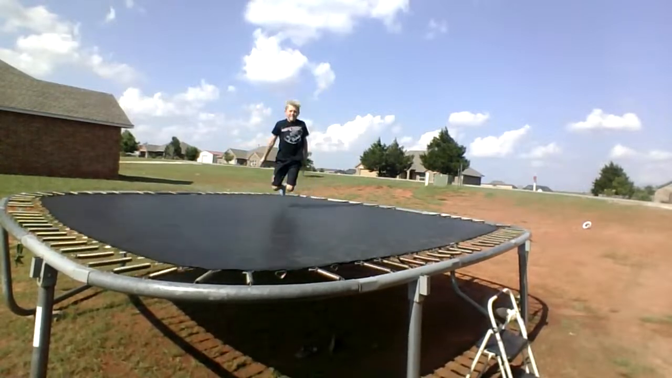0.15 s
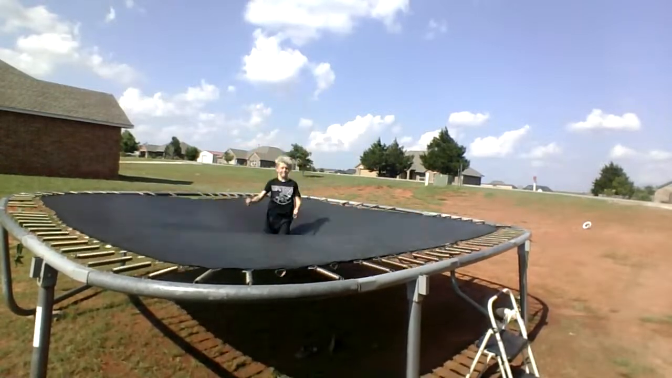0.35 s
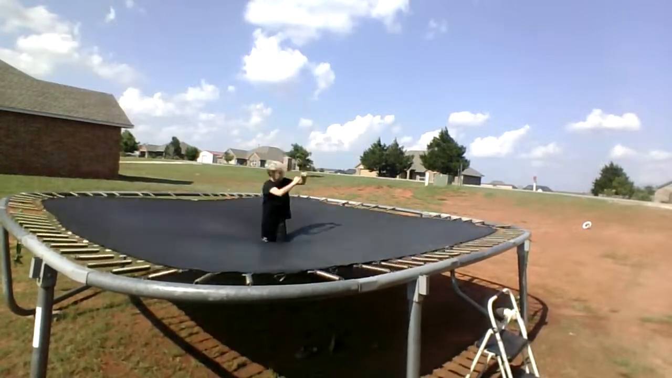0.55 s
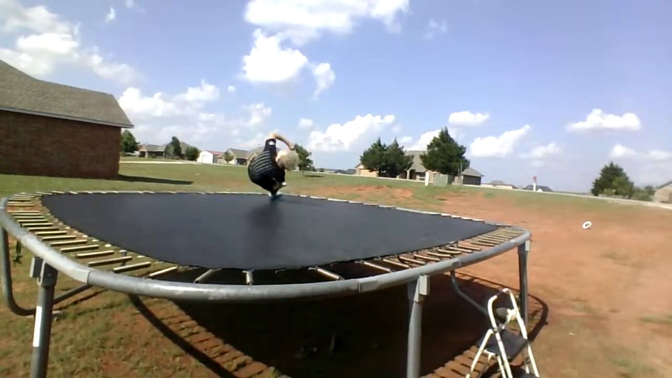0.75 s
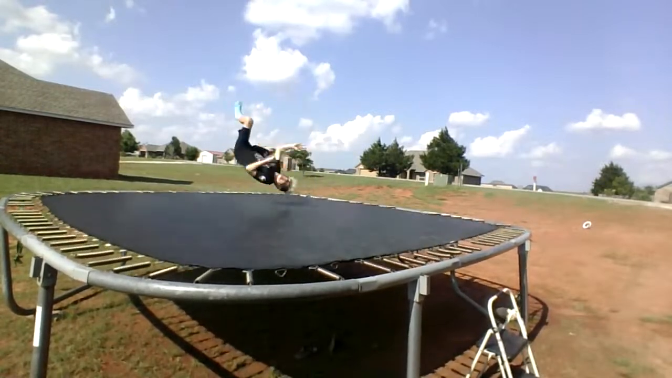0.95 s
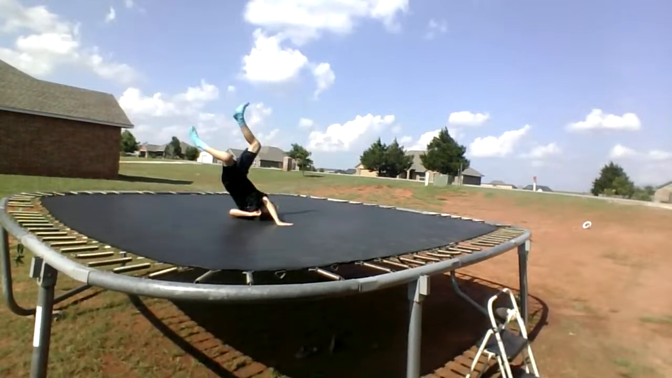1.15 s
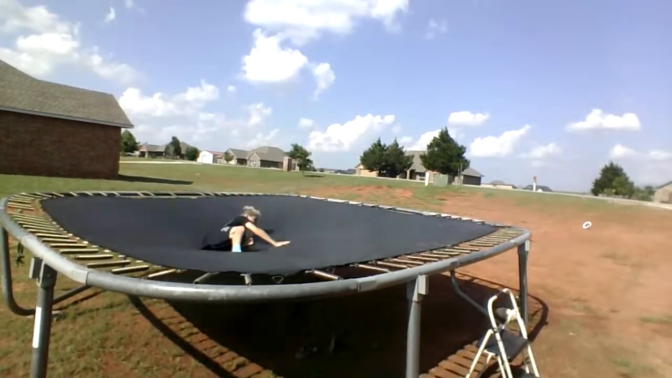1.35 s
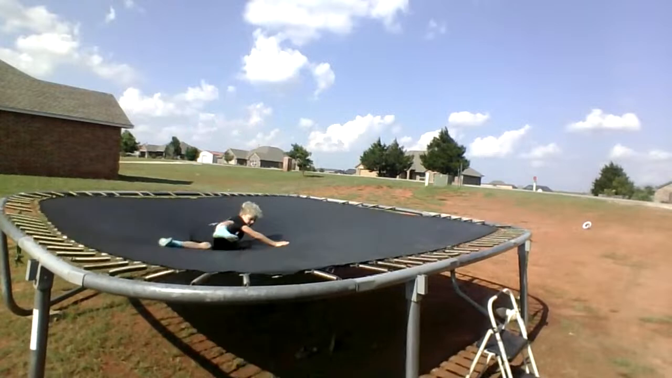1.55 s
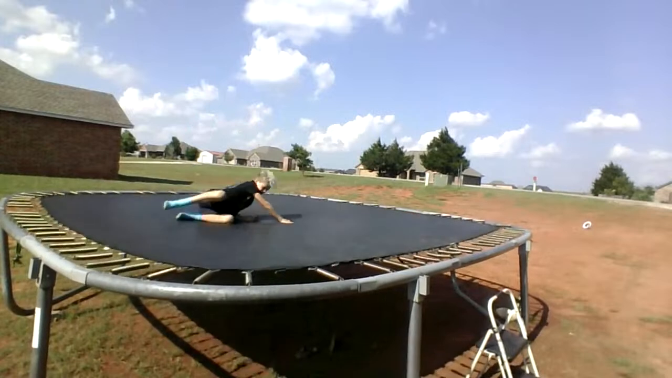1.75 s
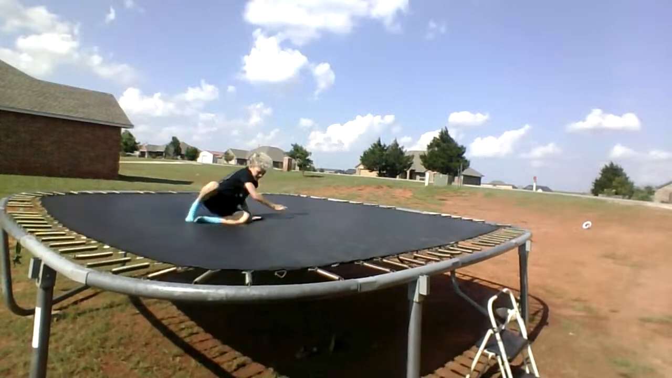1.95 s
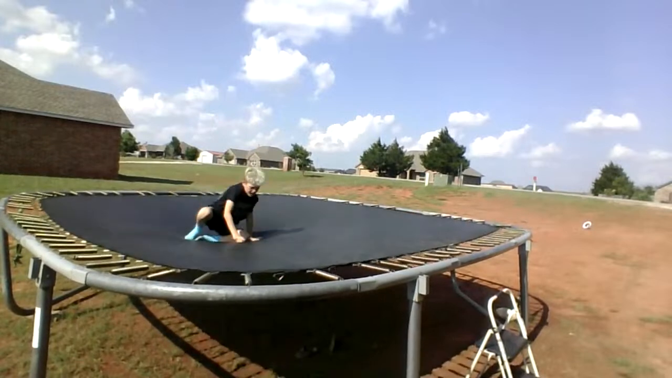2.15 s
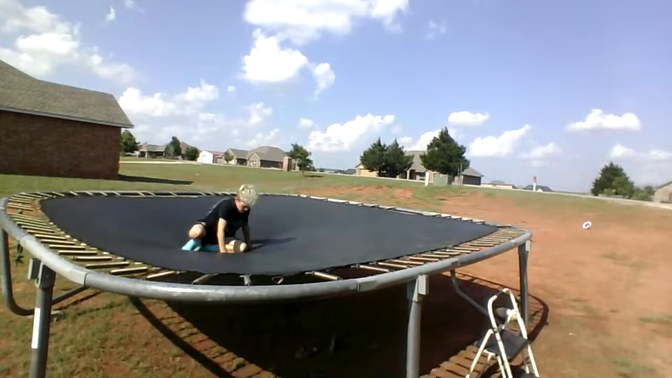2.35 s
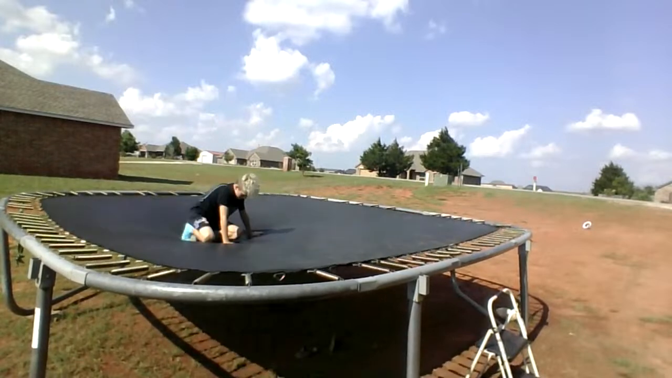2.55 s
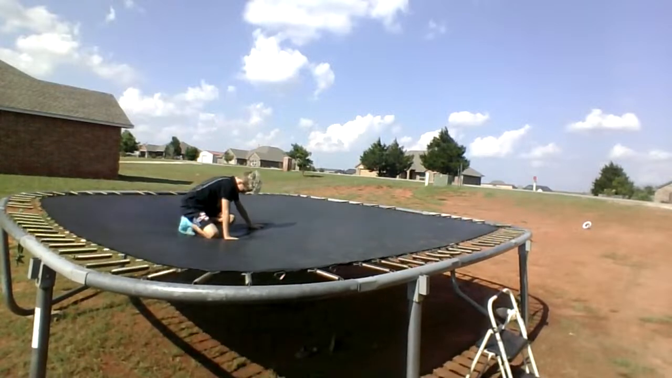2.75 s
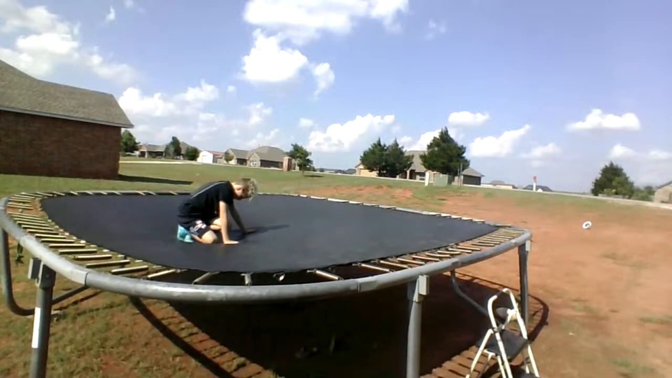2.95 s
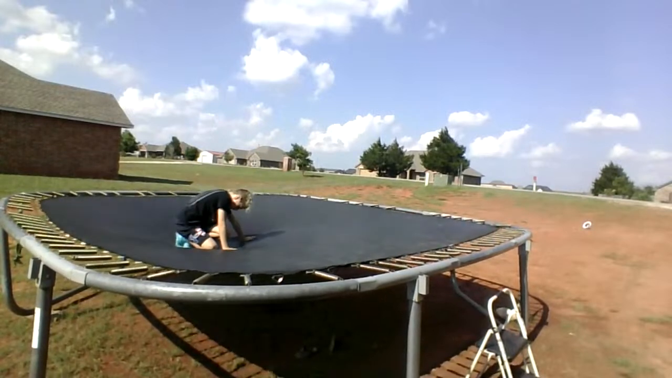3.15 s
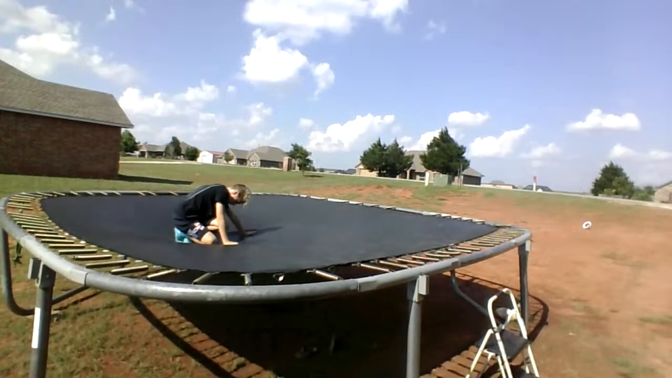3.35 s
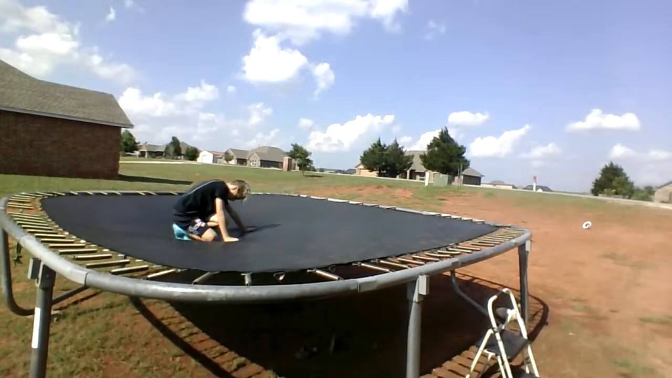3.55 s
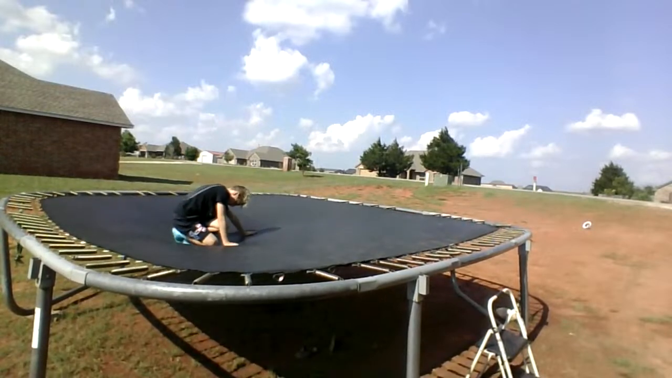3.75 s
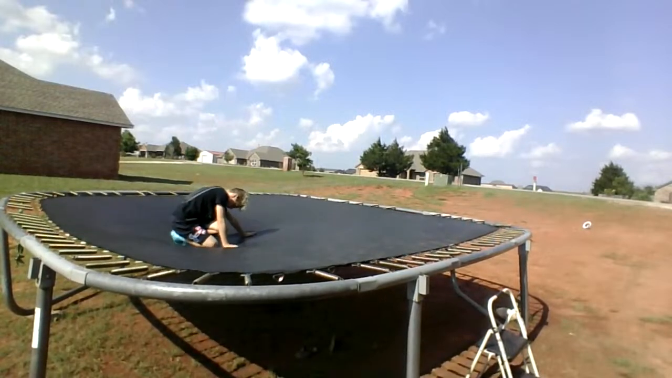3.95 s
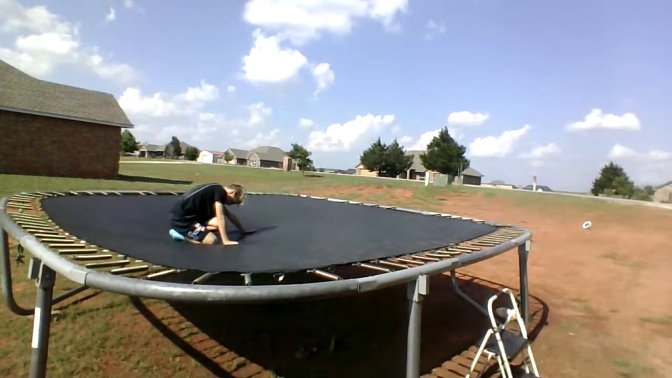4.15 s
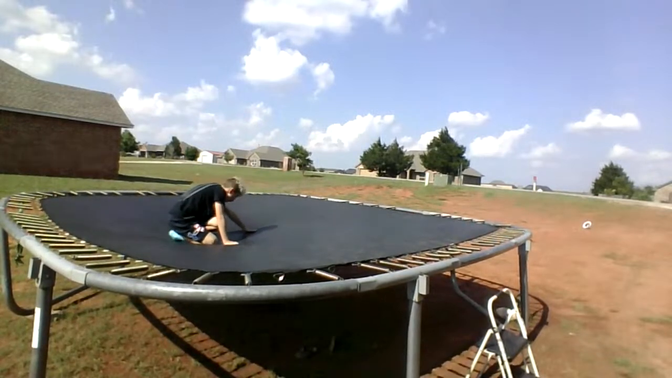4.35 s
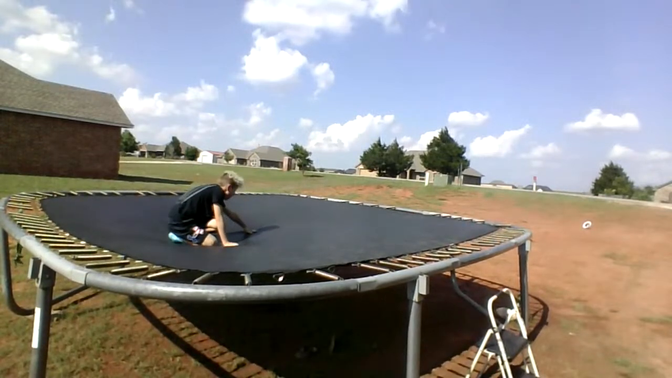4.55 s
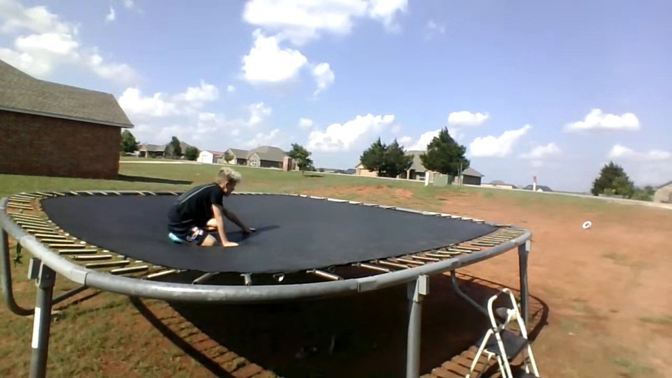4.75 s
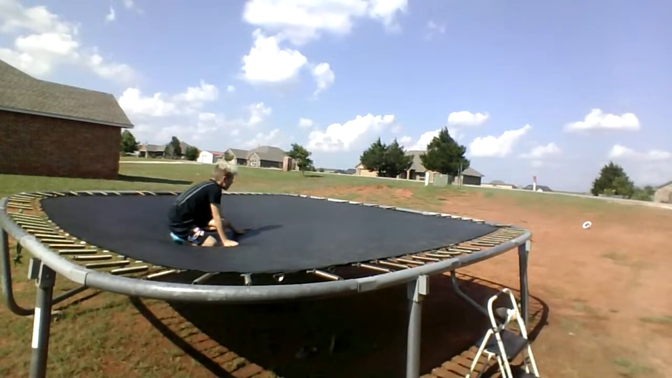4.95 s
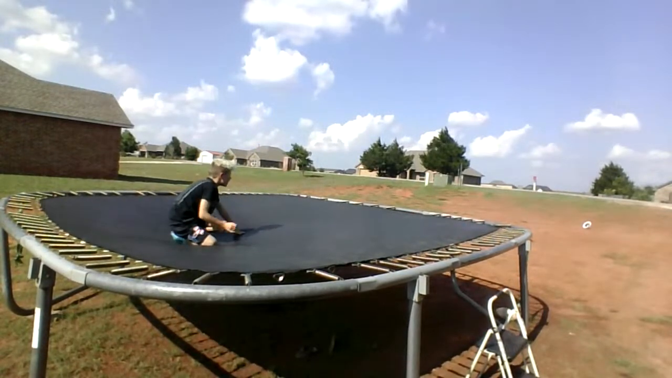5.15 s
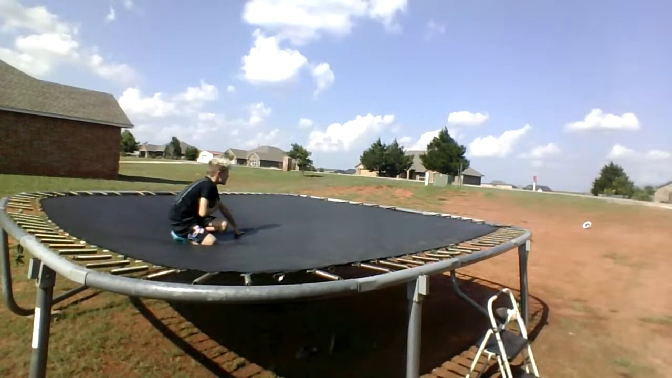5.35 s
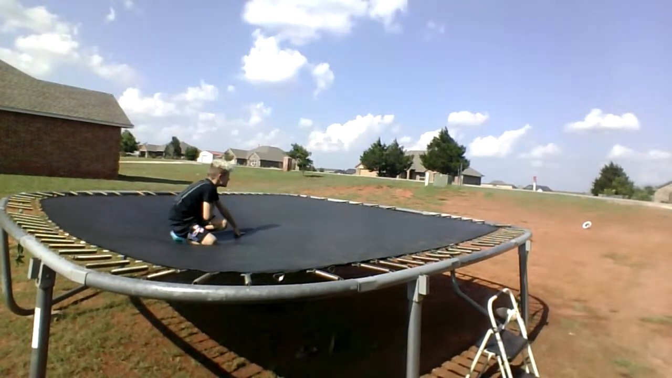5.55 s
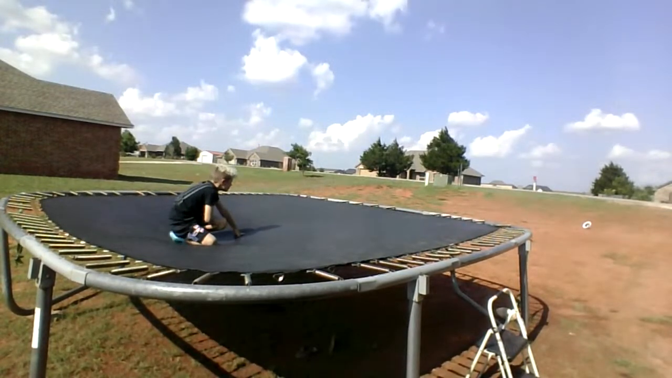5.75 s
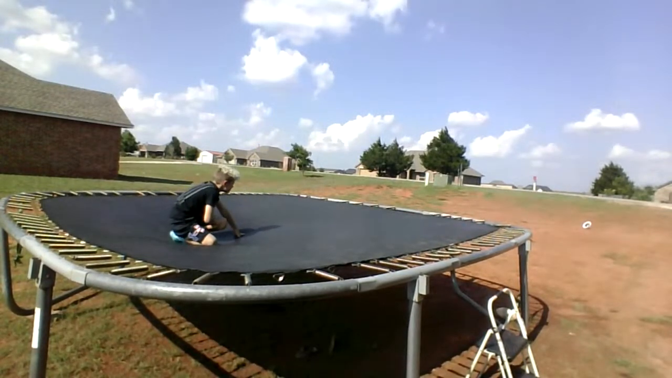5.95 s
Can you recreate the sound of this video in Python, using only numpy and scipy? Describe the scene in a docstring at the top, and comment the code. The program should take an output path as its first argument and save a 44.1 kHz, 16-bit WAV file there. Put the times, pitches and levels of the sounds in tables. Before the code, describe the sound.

Loud rusty metallic creaking and sharp spring clanks as someone bounces on a trampoline, fading to small ticks, cloth scuffs and quiet wind.

```python
"""Child on a garden trampoline

A child bounces twice, lands from a flip and rocks to rest on the mat.
The steel springs creak and squeal (stick-slip into ringing modes) and clank on the frame (decaying noise).
The mat thumps (short booms with a slap), cloth scuffs (noise bands) and the frame's joints knock.
A breeze rumbles (filtered noise) and whistles (a wavering tone) round the frame; a low hum swells once."""
import sys
import numpy as np
from scipy import signal
from scipy.fft import rfft, irfft, next_fast_len
from scipy.io import wavfile
from scipy.ndimage import uniform_filter1d, map_coordinates

SR = 44100
rng = np.random.default_rng(int(sys.argv[2]) if len(sys.argv) > 2 else 0)


def bounce(signal):
    """Save signal as a 16-bit WAV file at the path given by the first command-line argument."""
    frames = np.transpose(np.atleast_2d(signal))
    limited = np.clip(frames, -1, 1)
    pcm = np.round(limited * 32767).astype(np.int16)
    wavfile.write(sys.argv[1], SR, pcm)


N = 268565
TIME = np.arange(N) / SR


def amp(db):
    """Decibels to gain."""
    return 10 ** (np.asarray(db) / 20)


def evened(x):
    """Scales to rms 1."""
    return x / np.sqrt(np.mean(x ** 2) + 1e-20)


def steadied(x, seconds):
    """Scales to a running rms of 1."""
    return x / np.sqrt(abs(uniform_filter1d(x ** 2, max(int(seconds * SR), 8))) + 1e-12)


def sine(hz):
    """A tone of rms 1 that follows a pitch curve."""
    return np.sqrt(2) * np.sin(2 * np.pi * np.cumsum(hz) / SR)


def read(points, hz):
    """Reads a table on a log-frequency axis."""
    f, value = np.transpose(points)
    return np.interp(np.log(hz + 1), np.log(f + 1), value)


def played(rows):
    """The columns of a curve table at every sample."""
    s, *columns = np.transpose(rows)
    return [np.interp(TIME, s, c) for c in columns]


def add(mix, s, sound):
    """Mixes a sound in from time s."""
    start = round(s * SR)
    sound = sound[max(-start, 0):]
    part = mix[max(start, 0):][:len(sound)]
    part += sound[:len(part)]


def coloured(x, points):
    """Filters by a (Hz, dB) spectrum."""
    size = next_fast_len(len(x) + 2048)
    gain = amp(read(points, np.fft.rfftfreq(size, 1 / SR)))
    return irfft(rfft(x, size) * gain, size)[:len(x)]


def band(x, lo_hz, hi_hz, order=4):
    """Band-pass filter."""
    edges = [lo_hz, min(hi_hz, SR / 2 - 1)]
    return signal.sosfilt(signal.butter(order, edges, "bandpass", fs=SR, output="sos"), x)


def tilted(x, tilt_db):
    """Tilts the spectrum by dB per octave about 3 kHz, from 1 to 16 kHz."""
    return coloured(x, [(f, tilt_db * np.log2(f / 3000)) for f in (1000, 16000)])


def wander(per_s, count=N):
    """A smooth random curve of rms about 1, with per_s random knots a second."""
    knots = rng.standard_normal(4096)
    return map_coordinates(knots, [np.arange(count) * per_s / SR], order=2, mode="wrap")


def patchy(x, depth_db, width_hz, seconds):
    """Lets narrow strips of the spectrum swell and fade on their own."""
    hz, at, z = signal.stft(x, SR, nperseg=1024, noverlap=768)
    places = np.meshgrid(hz / width_hz, at / seconds, indexing="ij")
    field = map_coordinates(rng.standard_normal((512, 512)), places, order=2, mode="wrap")
    return signal.istft(z * amp(depth_db * field), SR, nperseg=1024, noverlap=768)[1][:len(x)]


def resonance(x, hz, width_hz):
    """Rings one mode, whose pitch may move."""
    turn = np.exp(2j * np.pi * np.cumsum(hz * np.ones(len(x))) / SR)
    decay = np.exp(-np.pi * width_hz / SR)
    return (turn * signal.lfilter([1], [1, -decay], x / turn)).imag


def slipping(per_s, spread_db, count=N):
    """A random train of tiny slips of uneven size and either sign."""
    sizes = rng.choice([-1, 1], count) * amp(spread_db * np.minimum(rng.exponential(1, count), 3))
    return sizes * (rng.random(count) < per_s / SR)


# each pull on the springs, as the mat is loaded or rebounds:
# (time at the hardest [s], creak level [dB], rise [s], fall [s],
#  low groan relative to the creak [dB], high rasp relative to the creak [dB])
PULLS = [(.005, -52, 0.028, 0.074, -2, -0.5), (.1, -65.5, 0.033, 0.15, 9.5, 8),
         (0.213, -62, 0.019, 0.063, 7.5, -4), (0.402, -34.5, 0.019, 0.13, -1, -6),
         (0.466, -33, 0.1, 0.2, 0.5, 2.5), (0.542, -24.5, 0.13, 0.068, -4.5, -3.5),
         (0.724, -27, 0.15, 0.13, -6.5, -3.5), (0.869, -35.5, 0.2, 0.14, -6.5, 3),
         (0.957, -38.5, 0.038, 0.086, -7.5, 2), (1.049, -45.5, 0.019, 0.073, -26, 8.5),
         (1.489, -24.5, 0.12, 0.13, -2, -2), (1.577, -28.5, 0.087, 0.089, -1, -12),
         (1.728, -32.5, 0.11, 0.16, -5.5, 0), (1.845, -42, 0.062, 0.08, 0, -1),
         (1.951, -39.5, 0.04, 0.063, -15, 0), (2.132, -58, 0.015, 0.02, 9, 3),
         (2.21, -48.5, 0.14, 0.46, -5, 3), (2.344, -33.5, 0.097, 0.098, -6, -4.5),
         (2.419, -39.5, 0.096, 0.091, -5.5, 3.5), (2.649, -52, 0.048, 0.14, -6.5, 0.5),
         (2.772, -46.5, 0.12, 0.093, -14, 1), (2.83, -51, .03, 0.062, -15.5, -0.5),
         (3.135, -59, 0.083, 0.082, -8, 3), (3.225, -50.5, 0.1, 0.082, -6.5, -2.5),
         (3.55, -71.5, 0.27, 0.21, 3, 8.5), (5.05, -68.5, 0.022, 0.093, 2, 6.5)]
PULL_DROP_DB = 24.5  # level lost over one rise or fall time
TIGHTEN, RELAX = 1.527, 1.3  # powers that bend the rise and the fall
SWAY_S, SWAY_LENGTH_S, SWAY_DB = 2, 1.5, -68  # the swaying mat keeps the springs faintly alive
AIRBORNE_S, LANDING_S, SLACK_DB = 0.29, .387, -13.5  # the springs hang slack until the knees land


def strain(step_size=32):
    """Gains of the creak, groan and rasp: every pull builds up and lets go, and their powers add."""
    t = TIME[::step_size]
    sway = amp(SWAY_DB) * np.exp(-(2 * (t - SWAY_S) / SWAY_LENGTH_S) ** 2)
    power = np.ones((3, 1)) * sway ** 2
    for s, db, rise, fall, groan_db, rasp_db in PULLS:
        before = (np.maximum(s - t, 0) / rise) ** TIGHTEN
        after = (np.maximum(t - s, 0) / fall) ** RELAX
        shape = amp(-PULL_DROP_DB * np.minimum(before + after, 10))
        power += (amp([[db], [db + groan_db], [db + rasp_db]]) * shape) ** 2
    slack = amp(SLACK_DB * ((t > AIRBORNE_S) & (t < LANDING_S)))
    return [np.interp(TIME, t, slack * gain) for gain in np.sqrt(power)]


# ringing of the springs and frame: (frequency [Hz], width [Hz], level [dB])
STEEL = [(1138, 120, -7.5), (1914, 100, 3), (2309, 100, 0), (2850, 220, 1), (3423, 110, -3.5),
         (4060, 130, -6), (4610, 84, -6.5), (5030, 51, -6.5), (6880, 76, -8)]


def steel_ring(t):
    """The main modes of the steel, struck together, each starting at a random phase."""
    modes = 0
    for hz, width, db in STEEL:
        modes += amp(db) * np.exp(-np.pi * width * t) * np.sin(2 * np.pi * (hz * t + rng.random()))
    return evened(modes)


def coil_ring(t, t60, count=34):
    """The scattered overtones of one coil, t60 being that at 3 kHz; the high ones die sooner."""
    place, size, turn = rng.random((3, count, 1))
    hz = 900 + 14000 * ((np.arange(count)[:, None] + place) / count) ** 1.8
    fade = amp(-60 * t / t60 * np.sqrt(hz / 3000))
    return evened((size * np.sin(2 * np.pi * (hz * t + turn)) * fade).sum(0))


# tone of the straining springs, shared by ticks and clinks: (frequency [Hz], density [dB per Hz])
CREAK_COLOUR = [(180, -49.5), (300, -24), (400, -5), (749, -1), (850, -11), (1350, -10), (1650, -12.5),
                (1850, -10.5), (2930, -4), (3640, -6.5), (6850, -8.5), (7900, -15.5), (10500, -9.5),
                (14000, -6), (16000, -5)]


def creak(slips_per_s=1100, spread_db=2.5, steel_db=-12, scrape_db=4.02, shift_db=3.0, rattle_db=1):
    """Hooks stick and slip, spring after spring: light pulls ring the coils, hard ones add dry crackle."""
    t, dry, rung = np.arange(SR // 8) / SR, np.zeros(N), np.zeros(N)
    scrape_t60, coil_t60 = .004, .17  # s
    turn_s, turn_gap_s = .13, .035  # each spring's turn, and the time until the next one joins
    harshen = .55  # power of the pull that brings in the crackle
    turn, frame = np.hanning(int(turn_s * SR)), amp(steel_db) * steel_ring(t)
    for s in np.arange(-turn_s, N / SR, turn_gap_s):
        scrape = evened(rng.standard_normal(len(t)) * amp(-60 * t / scrape_t60))
        slips = turn * slipping(slips_per_s, spread_db, len(turn))
        add(dry, s, signal.fftconvolve(slips, scrape))
        add(rung, s, signal.fftconvolve(slips, coil_ring(t, coil_t60) + frame))
    middle, groan, rasp = strain()
    crackle = amp(scrape_db) * (middle / middle.max()) ** harshen * dry
    body = coloured(rung + crackle, CREAK_COLOUR)
    # as the contact points creep, different modes catch
    body = patchy(body, shift_db, 150, .06)
    # the load shudders from spring to spring
    groan = groan * amp(rattle_db * wander(70))
    middle = middle * amp(rattle_db * wander(70))
    top = coloured(rung + dry, CREAK_COLOUR)
    low_part = groan * steadied(band(body, 490, 1800), 0.014)
    middle_part = middle * steadied(band(body, 1950, 8000), 0.031)
    high_part = rasp * steadied(band(top, 8000, 16500), 0.031)
    return low_part + middle_part + high_part


def clinks(count=24, per_s=110, t60=.05, spread_db=2.5, level_db=-5.5):
    """Hooks jump a whole notch: separate short clinks, each on the notes of its own spring."""
    t = np.arange(SR // 8) / SR
    middle, _, _ = strain()
    rings = np.zeros(N)
    for _ in range(count):
        jumps = slipping(per_s / count, spread_db)
        rings += signal.oaconvolve(jumps, coil_ring(t, t60))[:N]
    return amp(level_db) * middle * evened(band(coloured(rings, CREAK_COLOUR), 1200, 7000))


# the notes that the stretched coils keep returning to: (frequency [Hz], level [dB])
COIL = [(1529, -7), (2385, -9.5), (2800, -6), (2900, -3), (3042, -5), (3380, 0), (3840, -1), (4700, -0.5),
        (5399, -7.5)]


def coils(ring_db=-51, width_hz=20, taut_db=-35, uneven_db=3, drift=0.0037):
    """Slips keep the coils ringing on drifting notes that grow no louder once the springs are taut."""
    middle, _, _ = strain()
    # ring_db holds for a pull of -40 dB; pulls under -58 dB fade twice as steeply
    pull = np.minimum(middle, amp(taut_db)) / amp(-40) * np.minimum(middle / amp(-58), 1)
    notes = np.zeros(N)
    for hz, db in COIL:
        level = amp(db + uneven_db * wander(22))
        ring = resonance(slipping(500, 4.4), hz * (1 + drift * wander(12)), width_hz)
        notes += level * steadied(ring, 0.17)
    return amp(ring_db) * pull * notes


# single springs singing: (time at the loudest [s], length [s], frequency [Hz], level [dB])
SQUEALS = [(.06, 0.071, 1310, -55.5), (0.484, 0.052, 725, -29), (0.586, .09, 2910, -34),
           (0.642, 0.042, 1945, -19.5), (0.716, .06, 2267, -21.5), (0.956, 0.055, 4730, -42),
           (1.075, .04, 2130, -55), (1.2, 0.098, 3040, -44.5), (1.187, .05, 3970, -45),
           (1.365, 0.041, 980, -43.5), (1.383, 0.092, 3790, -43.5), (1.439, 0.074, 3860, -36),
           (1.405, 0.059, 1530, -34), (1.481, .02, 2043, -26), (1.536, 0.034, 1156, -27.5),
           (1.545, 0.055, 1830, -29.5), (1.578, 0.047, 698, -33), (1.602, 0.06, 1410, -30.5),
           (1.648, 0.029, 4200, -34.5), (1.649, 0.037, 2060, -32), (1.714, 0.052, 1830, -31.5),
           (1.868, 0.05, 1363, -44.5), (1.913, 0.044, 6770, -44), (2.183, 0.068, 3840, -50),
           (2.221, 0.18, 1550, -45.5), (2.24, .1, 4942, -51), (2.28, 0.138, 2914, -42),
           (2.318, 0.19, 999, -46), (2.659, 0.064, 2790, -46), (2.66, 0.08, 3400, -51.5),
           (2.651, 0.057, 4010, -54), (2.69, 0.099, 1092, -51), (2.781, 0.082, 3610, -53),
           (3.122, 0.1106, 2803, -63), (3.145, 0.097, 3030, -63.5), (3.231, .06, 1960, -53.5),
           (5.055, 0.049, 2290, -67), (5.084, 0.062, 2906, -75)]


def squeals(blur=.7, rough_db=2.8):
    """A hook slips in step with one coil mode, which swells and fades; the briefer, the more blurred."""
    out = np.zeros(N)
    for s, length, hz, db in SQUEALS:
        n = int(length * SR)
        tone = sine(hz + blur / length * wander(270, n))
        add(out, s - n / SR / 2, amp(db) * np.hanning(n) * tone * amp(rough_db * wander(120, n)))
    return out


# brief squeaks: (time at the loudest [s], length at half height [s], frequency at the loudest [Hz],
#                 level [dB], glide [octaves per s])
CHIRPS = [(0.031, .025, 1910, -53, 2), (0.187, 0.031, 1690, -58, -6), (0.917, .06, 3480, -42.5, 1.5),
          (5.883, .03, 954.5, -56.5, -4.5)]


def chirps():
    """Short squeaks, pure tones that slide up or down in pitch."""
    out = np.zeros(N)
    for s, length, hz, db, glide in CHIRPS:
        t = np.arange(-length, length, 1 / SR)
        add(out, s - length, amp(db) * np.hanning(len(t)) * sine(hz * 2 ** (glide * t)))
    return out


# hooks striking the frame: (time [s], level [dB], rise of the chatter [s], treble tilt [dB per octave])
CLANKS = [(0.389, -34, 0.0027, 12), (.397, -29, 0.00092, 9.5), (0.423, -19.5, 0.001, 4),
          (.626, -5.5, 0.003, 2.5), (0.701, -15, 0.001, -1.5), (1.169, -29, 0.013, -4.5),
          (1.665, -12, 0.002, 1.5), (1.932, -36, 0.002, -2.5)]
# tone of a clank: (frequency [Hz], density [dB per Hz])
CLANK_COLOUR = [(180, -56), (300, -32.5), (580, -21), (1660, -8), (1930, -6), (2440, 1), (3520, -4.5),
                (3830, -9.5), (5520, -11.5), (6740, -10), (7820, -21), (10000, -6), (10900, -17),
                (16000, -17)]
# how long a clank rings: (frequency [Hz], time to fall 60 dB [s])
CLANK_T60 = [(500, 0.82), (2000, 0.13), (4000, 0.25), (7000, 0.12), (10000, 0.052), (15000, 0.13)]


def clanks(steel_db=-3, jangle_db=-22, jangle_t60=0.82, hold=0.0032):
    """A slack hook chatters on the frame; the lows ring longest and the other springs jangle on."""
    out, t = np.zeros(N), np.arange(SR // 2) / SR
    for s, db, chatter, tilt_db in CLANKS:
        overtones = patchy(rng.standard_normal(len(t)), 4, 110, .4)
        hz, at, z = signal.stft(overtones, SR, nperseg=128)
        fade = amp(-60 * np.maximum(at - hold, 0) / read(CLANK_T60, hz)[:, None])
        jangle = amp(jangle_db - 60 * at / jangle_t60)
        crash = evened(signal.istft(z * (fade + jangle), SR, nperseg=128)[1][:len(t)])
        ring = evened(coloured(crash, CLANK_COLOUR)) + amp(steel_db) * steel_ring(t)
        ring = tilted(ring, tilt_db)
        # the level is that of the first 10 ms, before the rise softens it
        add(out, s, amp(db) * ring / np.std(ring[:SR // 100]) * np.minimum(t / chatter, 1))
    return out


# light ticks of the hooks: (time [s], peak level [dB], treble tilt [dB per octave])
TICKS = [(0.09, -36, 7), (1.267, -36.5, 4), (1.579, -20, -3.5), (4.125, -48.5, 7), (4.323, -46, 6),
         (4.39, -48.5, 4.5), (4.905, -43.5, 5.5), (5.36, -38.5, 7)]


def ticks(t60=.05):
    """Tiny dry slips of single hooks: short decaying noise in the springs' tone."""
    out, t = np.zeros(N), np.arange(SR // 10) / SR
    for s, db, tilt_db in TICKS:
        burst = rng.standard_normal(len(t)) * amp(-60 * t / t60)
        tick = tilted(coloured(burst, CREAK_COLOUR), tilt_db)
        add(out, s, amp(db) * tick / abs(tick).max())
    return out


# dull knocks in the frame's joints: (time [s], level [dB], ringing frequency [Hz])
KNOCKS = [(3.188, -40, 1413), (4.186, -56.5, 1395), (4.739, -57.5, 1746), (4.905, -57.5, 1451),
          (5.359, -52, 1697)]


def knocks(width_hz=75, rattle_db=-5, rattle_t60=0.17, snap_db=5):
    """A joint of the frame gives with a sharp snap, a short ring of the tube and a dull rattle."""
    out, t = np.zeros(N), np.arange(SR // 10) / SR
    blow = signal.unit_impulse(len(t))
    for s, db, hz in KNOCKS:
        snap = amp(snap_db) * resonance(blow, 1130, 540)
        tube = resonance(blow, hz, width_hz)
        noise = evened(band(rng.standard_normal(len(t)), 420, 1800))
        rattle = amp(rattle_db - 60 * t / rattle_t60) * noise
        add(out, s, amp(db) * (snap + tube + rattle))
    return out


# the mat taking the body, knees and hands:
# (time at the loudest [s], boom level [dB], middle frequency [Hz], length [s])
THUMPS = [(0.45, -33, 223, 0.03), (0.799, -44, 234.5, 0.044), (1.452, -30, 94.5, 0.032),
          (1.453, -33.5, 165.5, 0.023), (1.492, -41.5, 406.6, 0.1), (1.56, -36.5, 88.1, 0.025),
          (1.756, -36.5, 325, 0.02), (1.959, -31, 240, 0.024), (2.0, -46.5, 227.2, 0.079),
          (2.207, -52, 266, 0.074), (3.222, -44.5, 89.9, 0.041), (3.255, -45, 325, 0.034),
          (3.55, -50, 89.4, 0.018), (3.696, -54, 82.7, 0.028), (4.171, -53, 79.86, 0.033),
          (4.322, -51, 100.5, 0.048), (4.443, -52, 81.1, 0.032), (4.616, -55, 269.6, 0.03)]


def thumps(slap_db=-7, sag=.07):
    """The taut mat booms briefly, sagging in pitch, with a dull slap of cloth."""
    out = np.zeros(N)
    t = np.arange(-SR // 8, SR // 8) / SR
    for s, db, hz, length in THUMPS:
        pitch = hz * (1 - sag * np.tanh(t / length))
        boom = np.sqrt(2) * np.cos(2 * np.pi * np.cumsum(pitch) / SR)
        slap = evened(band(rng.standard_normal(len(t)), hz / 2, min(hz * 10, 1200), order=3))
        add(out, s + t[0], amp(db) * (boom + amp(slap_db) * slap) / np.cosh(3.14 * t / length))
    return out


# cloth scuffing on the mat as knees and hands shift:
# (time at the loudest [s], length at half height [s], level [dB], middle frequency [Hz])
SCUFFS = [(1.306, 0.059, -55, 458), (1.899, 0.077, -50.5, 295), (2.13, 0.032, -47.5, 1130),
          (2.305, 0.081, -50, 480), (2.588, 0.024, -52.5, 636), (2.665, 0.027, -64, 1360),
          (3.311, 0.045, -54.5, 680), (4.395, 0.035, -56, 504), (4.8, .08, -53.5, 523),
          (5.822, .03, -66.5, 1499), (3.62, .03, -66, 1500), (4.801, 0.036, -63.5, 1500)]


def scuffs(spread=1.49):
    """Short dull rubs of cloth on the woven mat: noise bands reaching a ratio of spread either way."""
    out = np.zeros(N)
    for s, length, db, hz in SCUFFS:
        n = int(2 * length * SR)
        rub = evened(band(rng.standard_normal(n), hz / spread, hz * spread, order=3))
        add(out, s - length, amp(db) * np.hanning(n) * rub)
    return out


# the whistle's pitch, which rises with wind speed: (time [s], frequency [Hz])
BREEZE = [(0, 830), (.2, 630), (.3, 640), (.85, 850), (1.12, 930), (2.95, 920), (3.45, 930), (3.76, 900),
          (3.89, 700), (4.1, 925), (4.53, 925), (4.68, 690), (5.08, 630), (5.38, 720), (5.53, 830),
          (5.62, 680), (6.08, 680)]
# eddies that make the whistle swell and sag:
# (time at the loudest [s], length at half height [s], level [dB], dip in pitch [Hz])
EDDIES = [(0.1, 0.049, -46.5, 32.7), (0.304, 0.21, -52.5, 32), (0.924, 0.077, -39, 90),
          (1.015, 0.044, -40, 69), (1.098, 0.051, -48.5, 29), (1.176, 0.04, -40.5, 71),
          (3.06, 0.11, -57.5, 90), (3.334, 0.0553, -49.5, 69.7), (3.535, 0.1, -54.5, 142),
          (3.705, 0.071, -58.5, 130), (3.819, 0.037, -51, 6.3), (3.889, 0.05, -58.5, 94),
          (4.051, 0.093, -52, 60), (4.41, 0.065, -52, 101), (4.513, 0.035, -52, 6.5),
          (4.668, 0.12, -53.5, 17.8), (4.821, 0.15, -54.5, 6.9), (5.288, 0.11, -57.5, 4.9),
          (5.453, 0.095, -47, 8.8), (5.705, 0.059, -53.5, 63), (5.982, 0.065, -52.5, 46)]


def whistle(steady_db=-66, fitful_db=4, flutter_db=3, slow_waver=0.076, fast_waver=.02):
    """Wind round the frame sings one tone, blurred when slow; each eddy swells it and bends it down."""
    hz, = played(BREEZE)
    swells, dips = np.zeros((2, N))
    for s, length, db, dip_hz in EDDIES:
        swell = np.hanning(int(2 * length * SR))
        add(swells, s - length, amp(db) * swell)
        add(dips, s - length, dip_hz * swell)
    waver = np.interp(hz, [660, 750], [slow_waver, fast_waver])
    tone = sine((hz - dips) * (1 + waver * wander(230)))
    # steady_db is reached at the highest pitch
    steady = (hz / hz.max()) ** 3 * amp(steady_db + fitful_db * wander(20))
    flutter = steadied(amp(flutter_db * wander(90)), 0.12)
    return np.hypot(swells, steady) * flutter * tone


# wind buffeting: (time [s], rumble level [dB])
GUSTS = [(0.0, -62), (0.74, -50.5), (1.15, -59.5), (1.44, -53), (3.08, -60), (3.95, -63.5), (4.35, -58.5),
         (5.03, -64)]
# tone of the moving air: (frequency [Hz], density [dB per Hz])
AIR = [(25, -26), (64, -9.5), (168, -7.5), (213, -9), (331, -2.5), (438, -5.5), (784, -6), (1020, -24.5),
       (3000, -38.5)]
# tone of the microphone hiss: (frequency [Hz], density [dB per Hz])
HISS = [(1000, -24.5), (3000, -10), (7000, -11), (15500, -3.5)]


def wind(lumpy_db=3.5, rush_db=-65.5, far_db=-70, hiss_db=-72.5):
    """Lumpy rumble and rush that follow the gusts, over distant air and a thin microphone hiss."""
    rumble_db, = played(GUSTS)
    air = coloured(rng.standard_normal(N), AIR)
    eddies = patchy(air, 3.5, 170, .05)
    rumble = amp(rumble_db + lumpy_db * wander(25)) * evened(band(air, 48, 270))
    # the rush follows the gusts less strongly
    rush = amp(rush_db + .3 * (rumble_db - rumble_db.mean())) * evened(band(eddies, 190, 1000))
    far = amp(far_db + 0.46 * wander(12)) * evened(band(eddies, 980, 2200))
    hiss = amp(hiss_db) * evened(coloured(rng.standard_normal(N), HISS))
    return rumble + rush + far + hiss


HUM_S, HUM_LENGTH_S, HUM_HZ, HUM_DB = 4.305, 0.56, 167, -54.5  # time at the loudest; peak level


def hum(waver=0.011):
    """A faint low wavering tone swells and fades once."""
    swell = np.exp(-(2 * (TIME - HUM_S) / HUM_LENGTH_S) ** 2)
    turns = np.cumsum(HUM_HZ * (1 + waver * wander(72))) / SR
    return amp(HUM_DB) * swell * np.sin(2 * np.pi * turns)


def scene():
    """Everything reaches one microphone, alike in both channels."""
    springs = creak() + clinks() + coils() + squeals() + chirps() + clanks() + ticks()
    frame_and_mat = knocks() + thumps() + scuffs()
    mono = springs + frame_and_mat + whistle() + wind() + hum()
    return np.array([mono, mono])


EDGE_HZ = 16100  # top of the band


def record(dry):
    """Full-scale clipping, then a steep low-pass."""
    lowpass = signal.firwin(511, EDGE_HZ, window=("kaiser", 9), fs=SR)
    return signal.oaconvolve(np.clip(dry, -1, 1), lowpass[None], "same")


dry = scene()
out = record(dry)
bounce(out)
```